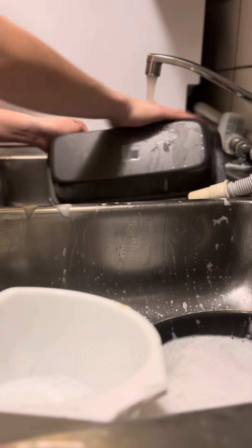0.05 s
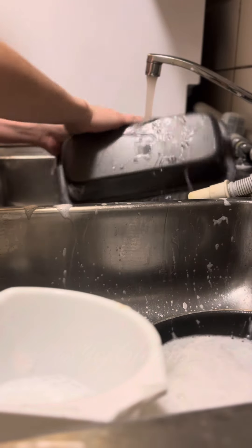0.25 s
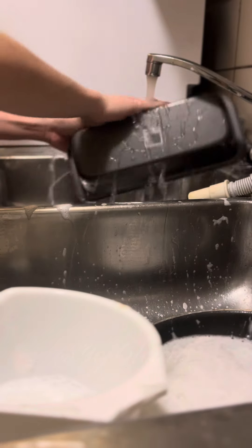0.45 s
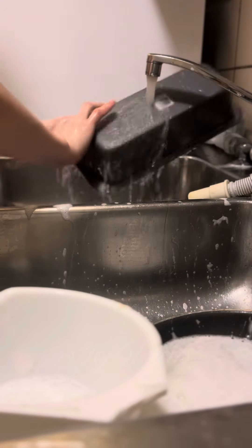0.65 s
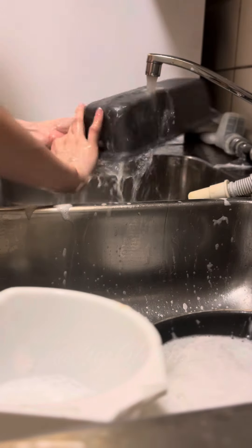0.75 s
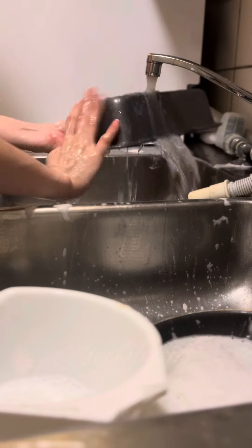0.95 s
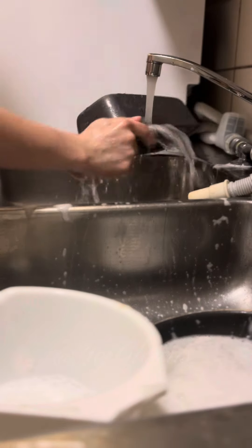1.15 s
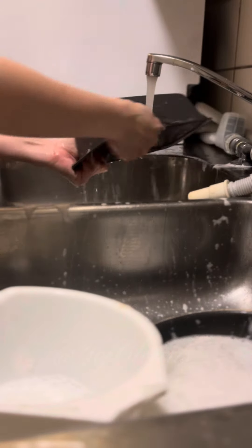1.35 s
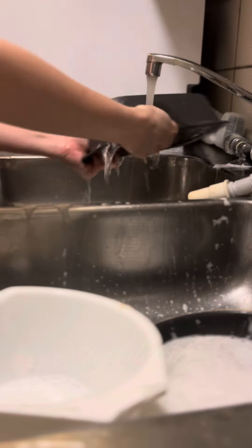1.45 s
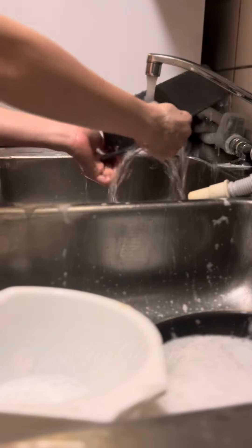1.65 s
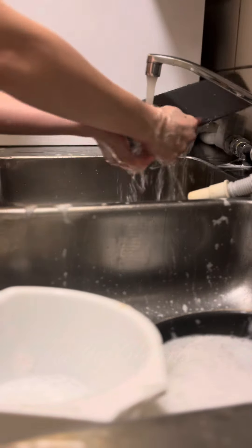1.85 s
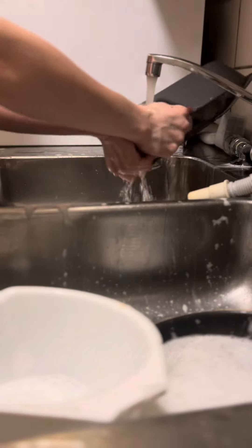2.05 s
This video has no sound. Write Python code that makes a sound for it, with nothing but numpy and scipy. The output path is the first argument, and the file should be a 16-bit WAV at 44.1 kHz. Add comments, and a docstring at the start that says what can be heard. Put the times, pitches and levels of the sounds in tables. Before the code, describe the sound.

Tap water runs and splashes in a steel sink as a plastic container bangs the basin

```python
"""A small kitchen, at a steel sink: a tap runs over a plastic container handled above the basin.
The jet hisses and spatters as noise and droplet ticks; small bubbles ring as brief rising tones.
Water gurgles in the container as coloured patter and gliding tones; run-off drums as low noise.
The container bangs twice on the basin and its rim chatters; later come soft thuds and more knocks.
Each blow is a falling chirp, a noise crack and ringing modes, with the chirp answered by the room."""
import sys
import numpy as np
from scipy import signal
from scipy.fft import rfft, irfft, next_fast_len
from scipy.io import wavfile
from scipy.ndimage import uniform_filter1d, map_coordinates

SR = 44100
rng = np.random.default_rng(int(sys.argv[2]) if len(sys.argv) > 2 else 0)


def wav_out(sig):
    """Save sig, one row per channel (or a flat mono array), as 16-bit PCM at SR to the path in sys.argv[1]."""
    wavfile.write(sys.argv[1], SR, np.round(np.clip(np.atleast_2d(sig).T, -1, 1) * 32767).astype(np.int16))


N = 92610
T = np.arange(N) / SR  # seconds
SIZE = next_fast_len(N + SR // 2)  # room for filter tails
HZ = np.fft.rfftfreq(SIZE, 1 / SR) + 1e-3  # just above zero, so that it can divide
HALF = np.array([[.5], [-.5]])  # shares a left-right difference between the microphones

# Colour of water breaking into droplets. Each row: frequency in Hz, level in dB.
HISS_COLOUR = [(500, 0), (900, -1), (1400, -4.5), (2000, -2.5), (3000, -3), (4500, -2), (6000, -5.5),
               (8000, -5), (11000, -11), (14000, -7.5), (16000, -20.5)]

# Bending waves in a sheet: the basin's delay in seconds at this pitch; higher ones come sooner.
BEND_S, BEND_HZ, BEND_POWER = 0.00855, 325.4, 0.89


def amp(db):
    """Decibels to gain."""
    return 10 ** (np.asarray(db) / 20)


def unit(x):
    """Scaled to rms 1."""
    return x / np.sqrt(np.mean(x ** 2) + 1e-20)


def along(points, hz=HZ):
    """(Hz, value) points read on a log frequency axis."""
    f, v = np.transpose(points)
    return np.interp(np.log(hz + 1), np.log(f + 1), v)


def curve(rows):
    """(s, value) rows, one value per sample."""
    return np.interp(T, *np.transpose(rows))


def wobble(rate):
    """A smooth random curve, rate knots a second."""
    return map_coordinates(rng.standard_normal(4096), [T * rate], mode="wrap")


def filtered(x, response):
    """x times a response on the frequency grid."""
    return irfft(rfft(x, SIZE) * response, SIZE)[..., :N]


def fade(t, t60):
    """Exponential decay by 60 dB in t60 seconds."""
    return np.exp(-np.log(1000) * t / t60)


def at(s, x):
    """x put off until second s."""
    return np.pad(x, [(0, 0), (round(s * SR), 0)])[:, :N]


def noise():
    """Two unrelated white noises."""
    return rng.standard_normal((2, N))


def patter(rate, spread_db):
    """Two streams of impacts at random moments, rate a second each, of random size and sign."""
    hits = rng.random((2, N)) < rate / SR
    sizes = amp(spread_db * np.clip(noise(), -2, 2))
    return unit(hits * np.sign(noise()) * sizes)


def spread(pair, colour_db):
    """Two unrelated signals become one coloured, partly alike stereo sound of rms 1."""
    # Likeness at the two microphones. Each row: frequency in Hz, left-right correlation (1 = alike).
    likeness = [(250, 0.99), (600, 0.55), (1200, 0.3), (1800, 0.5), (2700, 0.24), (4800, 0.15),
                (6000, 0.92), (8000, 0.88), (15000, 1)]
    turn = np.arccos(np.clip(along(likeness), -1, 1)) / 2
    shares = np.array([np.cos(turn), np.sin(turn)])
    mid, side = filtered(pair, amp(colour_db) * shares)
    return unit(np.array([mid + side, mid - side]))


def patchy(x, depth_db):
    """Droplets of like size come in clusters: brief patches of random gain in time and frequency."""
    z = signal.stft(x, nperseg=256)[2]
    field = uniform_filter1d(rng.standard_normal(z.shape[1:]), size=4, axis=0)
    field = uniform_filter1d(field, size=6, axis=1)
    gain = unit(amp(depth_db * np.clip(unit(field), -2, 2)))
    return signal.istft(z * gain, nperseg=256)[1][:, :N]


def jet():
    """The jet breaks up on the container into fine hiss and droplet ticks."""
    # Strength of the hiss. Each row: time in seconds, level in dB before the lift below.
    spray = [(0.0, -46.5), (0.61, -47), (0.96, -47.5), (1.23, -49.5), (1.69, -49.5), (1.81, -47.5),
             (2.1, -46)]
    lift_db, drops_db = 4, -8.5
    grains = noise() + amp(drops_db) * patter(rate=900, spread_db=5)
    slow_flicker_db = 1.1 * wobble(24)
    fast_flicker_db = 1.3 * wobble(150)
    level_db = curve(spray) + lift_db + slow_flicker_db + fast_flicker_db
    return amp(level_db) * patchy(spread(grains, along(HISS_COLOUR)), depth_db=1.5)


def gurgle():
    """Falling water stirs the container's hollow, which at times rings almost as a tone."""
    # Water in the container. Each row: time in seconds, level in dB.
    water = [(0, -44.5), (.08, -51.5), (.45, -44), (.6, -50), (.7, -49), (.87, -47), (1.04, -44.5),
             (1.12, -53.5), (1.21, -51), (1.25, -43.5), (1.33, -49.5), (1.42, -43.5), (1.53, -48.5),
             (1.61, -39), (1.72, -46.5), (1.97, -46), (2.1, -50.5)]
    # Colour of the hollow. Each row: frequency in Hz, level in dB.
    hollow_colour = [(150, -10), (240, -12.5), (320, -19), (400, 7), (460, 3), (540, -3.5), (650, -8),
                     (760, -21), (860, -0.5), (1000, -29), (2000, -34)]
    # Tones of the cavity as the jet pours in.
    # Each row: start in seconds, length in seconds, pitch in Hz, glide in Hz per second, level in dB.
    glugs = [(0.849, 0.032, 490, -450, -42), (0.897, 0.095, 424, -280, -36), (1.361, 0.029, 485, -150, -37),
             (1.402, 0.036, 480, -350, -36.5), (1.469, 0.061, 438, -550, -37),
             (1.635, 0.033, 464, 195, -36), (1.945, 0.11, 468.4, -84, -42)]
    hollow = spread(patter(500, spread_db=7.0), along(hollow_colour))
    out = amp(curve(water) + 1.5 * wobble(45.02)) * hollow
    for s, length, hz, glide, db in glugs:
        cycles = hz * T + glide * T ** 2 / 2
        tone = np.sin(2 * np.pi * cycles + 0.13 * wobble(89))
        swell = np.sqrt(np.abs(np.sin(np.pi * np.minimum(T / length, 1))))
        out += at(s, amp(db) * (tone * swell)[None])
    return out


def runoff():
    """Water spilling off the container drums on the sink floor as low noise."""
    # Colour of the sink floor. Each row: frequency in Hz, level in dB.
    floor_colour = [(20, -47), (30, -27), (45, -26), (60, -0.5), (100, -1), (135, 4), (180, -9.5),
                    (280, -8.5), (600, -28.5)]
    # Strength of the run-off. Each row: time in seconds, level in dB.
    drumming = [(0, -55.5), (0.5, -48.5), (0.75, -45), (1.05, -49), (1.2, -52.5), (1.45, -50),
                (1.65, -41.5), (2.1, -49.5)]
    level_db = curve(drumming) + 0.72 * wobble(25.0)
    return amp(level_db) * spread(noise(), along(floor_colour))


def blip(hz, cycles, side):
    """One bubble rings briefly and rises in pitch; side 0-1 sets its left-right phase difference."""
    t = T[:SR // 20]
    age = t * hz / cycles  # in decay times
    apart = np.array([[0], [np.pi * (side - .5)]])
    tone = np.sin(2 * np.pi * hz * t * (1 + 0.0062 * age) + apart)
    return tone * np.exp(-age) * (1 - np.exp(-10 * age))


def bubbles():
    """Trapped air rings: many small bubbles, and a few clear plinks from single drops."""
    # Single drops that trap a bubble. Each row: start in seconds, pitch in Hz, level in dB.
    plinks = [(0.768, 2990, -35), (0.792, 3880, -32), (1.434, 3350, -34)]
    per_s, centre_hz, octaves = 350, 3530, 1.2
    level_db, range_db = -55.5, 27  # all small bubbles together; loudest over softest
    out = np.zeros((2, N + SR))
    for when, side, pitch, size in rng.random((int(per_s * N / SR), 4)):
        hz = centre_hz * 2 ** (octaves * (pitch - .5))
        ring = amp(range_db * size) * blip(hz, 28, side)
        start = int(when * N)
        out[:, start:start + ring.shape[1]] += ring
    out = amp(level_db) * unit(out[:, :N])
    for s, hz, db in plinks:
        plink = blip(hz, 40, rng.random())
        out += amp(db) * at(s, np.pad(plink, [(0, 0), (0, N)]))
    return out


def splashes():
    """Short, clumpy showers of droplets as water is flung against the steel."""
    # Splashes off hands and container.
    # Each row: start in seconds, level in dB, decay time in seconds, treble tilt in dB per octave.
    showers = [(0.125, -41.5, 0.061, -5), (0.388, -37.5, 0.027, -10.5), (0.636, -34.5, 0.015, 2),
               (0.651, -38, 0.024, -3), (0.703, -37.5, 0.0067, 1), (0.763, -28.5, 0.01, -2.5),
               (0.788, -35.5, 0.017, -2), (0.974, -33.5, 0.036, 0), (1.244, -41, 0.11, -1),
               (1.382, -36.5, 0.044, -3.5), (1.429, -34, 0.018, -8.5), (1.615, -35, 0.029, -4.5),
               (1.63, -39.5, 0.082, -3), (1.72, -39.5, 0.037, 3.5), (1.837, -40.5, 0.034, -13),
               (1.920, -35, 0.0069, 2)]
    thin_db = along([(300, -40), (1500, -17.0), (3200, 5.5)])  # little bass in a splash
    out = np.zeros((2, N))
    for s, db, length, tilt_db in showers:
        tilt = tilt_db * np.log2(np.maximum(HZ, 500) / 4000)
        shower = spread(patter(3000, spread_db=4.5), along(HISS_COLOUR) + tilt + thin_db)
        rise_s = max(.003, length / 4)
        rise = np.minimum(T / rise_s, 1)
        fall = np.exp(-np.maximum(T - rise_s, 0) / length)
        out += amp(db) * at(s, shower * rise * fall)
    return patchy(out, depth_db=3.2)


def room(x):
    """The kitchen's answer: a noise tail, each band dying at its own speed."""
    # Reverberation of the kitchen. Each row: frequency in Hz, t60 in seconds.
    decay = [(60, 1), (200, 0.09), (700, 0.67), (2000, 0.51)]
    delay_s = 0.011
    hz, t, z = signal.stft(spread(noise(), 0)[:, :SR // 2], SR, nperseg=512)
    tail = signal.istft(z * fade(t, along(decay, hz)[:, None]), SR, nperseg=512)[1]
    tail /= np.linalg.norm(tail[0])
    return at(delay_s, signal.fftconvolve(x[None], tail, axes=1))


def drift(t):
    """A random curve over the times t, 45 knots a second, for one ringing mode."""
    return np.interp(t * 45, np.arange(32), rng.standard_normal(32))


def ringing(modes, choke_s):
    """Modes of a struck body, unsettled by moving water on its walls, damped around choke_s."""
    waver_db, waver_rad = 2.2, 0.3
    spread_rad_per_hz = 0.00095  # higher modes reach the two microphones less in step
    t = T[:SR // 2]
    out = np.zeros((2, len(t)))
    for hz, db, t60 in modes:
        phase = 2 * np.pi * (hz * t + rng.random()) + waver_rad * drift(t)
        apart = spread_rad_per_hz * hz * rng.standard_normal() * HALF
        out += amp(db + waver_db * drift(t)) * fade(t, t60) * np.sin(phase + apart)
    rise = 1 - np.exp(-t / BEND_S)
    choke = 1 / np.sqrt(1 + (t / choke_s) ** 8)
    return np.pad(out * rise * choke, [(0, 0), (0, N - len(t))])


def blows(rows, modes, crack_hz, rise_s, bend_s, choke_s, room_db):
    """Each contact gives a crack, a falling chirp of bending waves, and the struck body's ringing."""
    # Colour of the crack. Each row: frequency in Hz, level in dB.
    crack_colour = [(500, -52), (1150, 2), (1600, -12), (2200, -7.5), (3000, -10), (4400, -4),
                    (5500, -22.5), (8000, -23), (16000, -52)]
    crack_t60_s = 0.051
    sizzle_db, sizzle_t60_s = -17, 0.56  # dense high modes ring on after the crack
    delay = bend_s * (BEND_HZ / np.maximum(HZ, BEND_HZ / np.sqrt(2))) ** BEND_POWER
    bend = np.exp(-2j * np.pi * np.cumsum(delay) * SR / SIZE)
    snap = fade(T, crack_t60_s) + amp(sizzle_db) * fade(T, sizzle_t60_s)
    snap *= 1 - np.exp(-T / rise_s)
    dull_db = -10 * np.log10(1 + (HZ / crack_hz) ** 12)
    under_modes = 1 + (.75 * modes[0][0] / HZ) ** 10  # little sound under the lowest mode
    out = np.zeros((2, N))
    for s, db, low_hz, high_hz, crack_db, ring_db in rows:
        band = (1 + (low_hz / HZ) ** 4) * (1 + (HZ / high_hz) ** 7) * under_modes
        boom = irfft(bend / np.sqrt(band), SIZE)[:N]
        boom /= np.abs(boom).max()
        crack = amp(crack_db) * snap * spread(noise(), along(crack_colour) + dull_db)
        ring = amp(ring_db) * ringing(modes, choke_s)
        out += amp(db) * at(s, boom + crack + ring + amp(room_db) * room(boom))
    return out


def basin():
    """The steel basin booms under hard bangs and soft thuds, its ring hardly choked."""
    # Bangs of the container on the basin. Each row: start in seconds, level in dB,
    # lowest and highest Hz of the boom, crack and ring in dB relative to the blow.
    bangs = [(0.2047, -3.5, 302, 484, -10, -11.5), (0.2798, -2.5, 209, 370, -13.5, -14)]
    # Soft thuds of the basin. Each row: start in seconds, level in dB,
    # lowest and highest Hz of the boom, crack and ring in dB relative to the blow.
    thuds = [(0.683, -33, 99, 213, -35, -17), (0.782, -35, 91, 172, -27, -21),
             (1.015, -34, 110, 240, -28, -18.5), (1.483, -30.5, 149, 430, -9.5, -36),
             (1.489, -22, 117, 162, -18, -16.5), (1.808, -24.5, 90, 121, -22, -36)]
    # Ringing of the steel. Each row: pitch in Hz, level in dB, t60 in seconds before choking.
    steel_modes = [(80, -13, .5), (104, -14, .45), (134, -8, .45), (172, -10, .35), (252, -2, .3),
                   (303, -8, .3), (337, -8, .25), (398, 0, .3), (429, -8, .25), (529, -4.5, .35),
                   (580, -12, .25), (640, -16, .35), (720, -10, .35), (738, -10, .3), (835, -18, .35),
                   (869, -18, .4), (926, -16, .32), (1107, -16, .24), (1152, -19, .2), (1215, -18, .2),
                   (1352, -21, .26), (2094, -16, .23), (2424, -20, .18), (3169, -22, .25), (4338, -22, .2),
                   (4486, -22, .2)]
    return blows(bangs + thuds, steel_modes, crack_hz=13000, rise_s=0.0032, bend_s=BEND_S,
                 choke_s=0.5, room_db=-9)


def rim():
    """The container's hard rim ticks on the steel, then chatters as it settles."""
    # First hard touch in each bang. Each row: start in seconds, level in dB, centre in Hz,
    # width in octaves, t60 in seconds.
    ticks = [(0.2059, -11.5, 4130, 0.78, 0.0065), (0.2793, -23, 5830, 0.52, 0.046)]
    # Colour of the chatter. Each row: frequency in Hz, level in dB.
    rattle_colour = [(300, -28), (440, -5), (520, 2), (620, -11), (725, 3.5), (785, -3), (850, -8),
                     (1000, -29), (3000, -25), (8000, -50)]
    start_s, rattle_db, rattle_t60_s = 0.29, -27, 0.65
    rattle = spread(patter(rate=160, spread_db=-0.5), along(rattle_colour))
    out = at(start_s, amp(rattle_db) * fade(T, rattle_t60_s) * rattle)
    for s, db, hz, octaves, t60 in ticks:
        colour_db = -10 * (np.log2(HZ / hz) / octaves) ** 2
        out += amp(db) * at(s, fade(T, t60) * spread(noise(), colour_db))
    return out


def container():
    """Soft plastic gives a gradual, duller crack, and the hands soon choke its ring."""
    # Knocks on the container. Each row: start in seconds, level in dB,
    # lowest and highest Hz of the boom, crack and ring in dB relative to the blow.
    knocks = [(0.657, -31.5, 296, 686, -7, -5), (1.009, -30.5, 217, 504, -31, -13),
              (1.600, -27, 386, 480, -12, -13), (1.645, -33, 420, 1000, -8, -12),
              (1.799, -22, 420, 750, -7, -6), (1.8065, -9.5, 320, 450, -15, -11.5),
              (1.834, -28, 340, 560, -18, -8)]
    # Ringing of the plastic. Each row: pitch in Hz, level in dB, t60 in seconds before choking.
    plastic_modes = [(334, -6, .25), (362, 0, .33), (392, -5, .25), (474, -10, .4), (593, -6, .3),
                     (742, -12, .3), (811, -16, .2), (938, -12, .33), (1200, -20, .25), (1360, -21, .3)]
    # the small container spreads a blow less in time than the basin
    return blows(knocks, plastic_modes, crack_hz=2680, rise_s=0.005, bend_s=0.00485,
                 choke_s=0.094, room_db=-8)


def placed(x):
    """The two microphones hear x at slightly different times and levels in each band."""
    # Arrival at the microphones. Each row: frequency in Hz, milliseconds by which the left is earlier.
    lead = [(300, -.15), (600, -.22), (1100, -.2), (1800, 0), (2400, .14), (4000, .1), (5600, .243),
            (16000, .243)]
    # Balance of the microphones. Each row: frequency in Hz, left over right in dB.
    balance = [(250, 0), (520, 2.6), (850, -1.5), (4000, -1), (8000, 0)]
    shift = np.exp(2j * np.pi * HZ * HALF * along(lead) / 1000)
    return filtered(x, amp(HALF * along(balance)) * shift)


def scene():
    """Water and contacts together, as they reach the microphones."""
    water = jet() + gurgle() + runoff() + bubbles() + splashes()
    contacts = basin() + rim() + container()
    return placed(water + contacts)


def record(dry):
    """The recorder rounds off the highest peaks and keeps nothing above its band limit."""
    top_hz = 15800
    rounded = dry / (1 + np.abs(dry) ** 8) ** (1 / 8)
    return filtered(rounded, HZ < top_hz)


dry = scene()
out = record(dry)
wav_out(out)
```